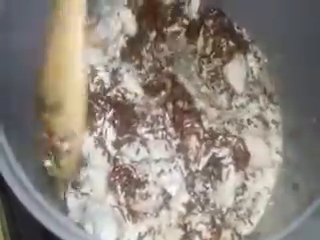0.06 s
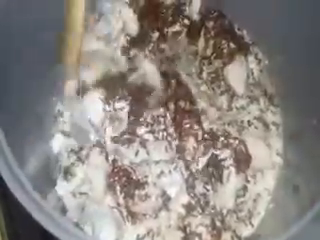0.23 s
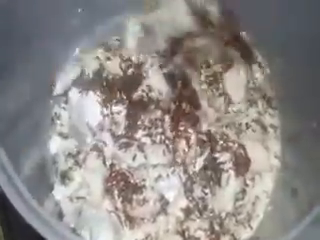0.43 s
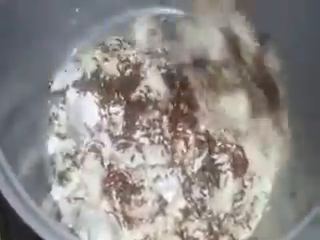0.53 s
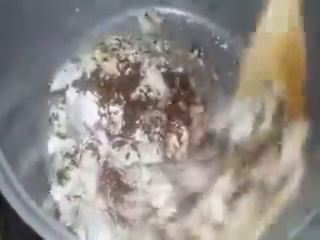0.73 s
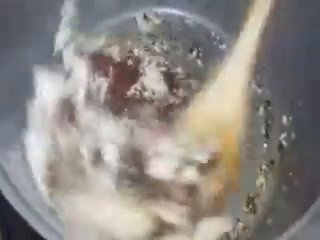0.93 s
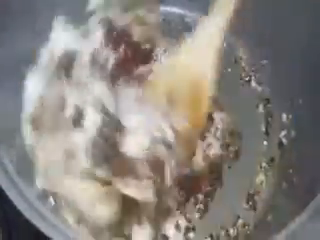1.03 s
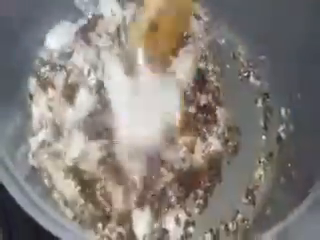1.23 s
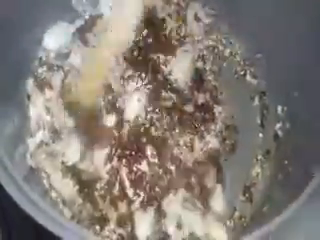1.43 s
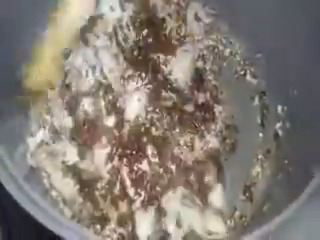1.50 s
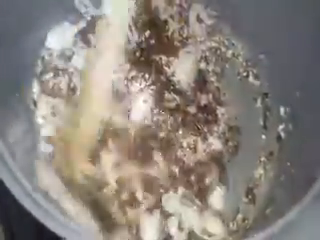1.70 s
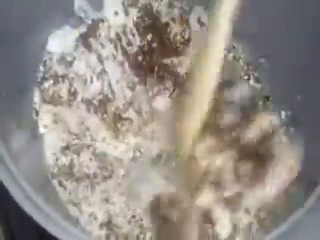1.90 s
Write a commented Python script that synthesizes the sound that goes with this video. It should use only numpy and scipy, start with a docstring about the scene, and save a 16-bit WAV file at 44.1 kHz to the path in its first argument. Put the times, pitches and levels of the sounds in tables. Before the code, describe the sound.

A wooden spoon stirs a thick mixture in a metal pot, knocking the wall hard early on, then scraping with a brief squeal and sinking into soft wet smearing and clicks; close microphone, kitchen, slight overload.

```python
"""A wooden spoon stirs a thick, creamy mixture in a metal pot, close up in a kitchen.
The spoon knocks the wall once, as fading tones and noise loud enough to overload the microphone.
It also scrapes round the pot: tiny random slips excite drifting resonances, muffled as the spoon sinks.
Grainy noise and short noise bursts make the mixture smear and click, and the spoon tick on the metal.
Low noise and bumps make the pot rumble on its base, with a faint late echo and steady hiss behind."""
import sys
import numpy as np
from scipy import signal
from scipy.fft import rfft, irfft
from scipy.io import wavfile

SR = 44100
rng = np.random.default_rng(int(sys.argv[2]) if len(sys.argv) > 2 else 0)


def dump_mix(stems):
    """Bounce the given channels to the path in sys.argv[1] as a 16-bit WAV at rate SR."""
    frames = np.atleast_2d(stems).T  # one column per channel
    limited = np.clip(frames, -1, 1)  # hard clip at full scale
    pcm = np.round(limited * 32767).astype(np.int16)
    wavfile.write(sys.argv[1], SR, pcm)


N = 85995  # length in samples

# high resonances of the bare metal, for scrape and ticks: pitch_hz, width_hz, level_db
RASP = [(3393.3, 120, 0), (3664, 90, 1), (3902, 150, -3), (4205, 170, -5), (4507, 133, 0), (4690, 132, -5),
        (5060, 140, -3.5), (5320, 130, -9), (5693, 157, -5), (6450, 130, -8.5), (6685, 190, -13.5),
        (7275, 180, -14), (10070, 250, -31.5)]


def amp(db):
    """Turns decibels into a plain gain."""
    return 10 ** (np.asarray(db) / 20)


def evened(x):
    """Scales a sound to an average strength (rms) of 1."""
    return x / np.sqrt(np.mean(x ** 2) + 1e-20)


def read(points, hz):
    """Reads a curve between its (pitch_hz, value) points, on a logarithmic pitch scale."""
    point_hz, value = np.transpose(points)
    return np.interp(np.log(hz + 1), np.log(point_hz + 1), value)


def level(points):
    """Gain over time from (time_s, level_db) points."""
    return amp(np.interp(np.arange(N) / SR, *np.transpose(points)))


def add(mix, start_s, sound):
    """Lays a sound into the mix from its start time."""
    part = mix[max(round(start_s * SR), 0):][:len(sound)]
    part += sound[:len(part)]


def colour(x, spectrum):
    """Boosts or cuts each pitch by a (pitch_hz, level_db) curve."""
    gain = amp(read(spectrum, np.fft.rfftfreq(len(x), 1 / SR)))
    return irfft(rfft(x) * gain, len(x))


def coloured_noise(spectrum, size):
    """Random noise of rms 1 with the given balance of pitches."""
    return evened(colour(rng.standard_normal(size), spectrum))


def resonate(x, hz, width_hz):
    """A steep resonance of gain 1, made by running one peak filter twice."""
    # each pass is wider, so that the two together have the asked width
    pass_width = min(1.55 * width_hz, .3 * SR)
    b, a = signal.iirpeak(min(hz, .45 * SR), hz / pass_width, SR)
    return signal.lfilter(b, a, signal.lfilter(b, a, x))


def band_noise(hz, width_hz, size):
    """Noise of rms 1 around one pitch, taken from the end, where the resonance has built up."""
    return evened(resonate(rng.standard_normal(SR // 2), hz, width_hz)[-size:])


def wander(rate_hz, size):
    """Random motion of rms 1, mostly slower than the given rate."""
    hz = np.fft.rfftfreq(size, 1 / SR)
    return evened(irfft(rfft(rng.standard_normal(size)) / (1 + (hz / rate_hz) ** 4), size))


def slow_wander(rate_hz):
    """Random values, so many a second, joined by straight lines."""
    knots = rng.standard_normal(200)
    return np.interp(np.arange(N) * rate_hz / SR, np.arange(len(knots)), knots)


def fade(t, t60):
    """Natural fade that loses 60 dB in t60 seconds; a negative t60 makes it grow instead."""
    return np.exp(-np.log(1000) * t / t60)


def fading_noise(t60s, spectrum):
    """Half a second of coloured noise, each band fading (or growing) at its own speed."""
    hz, t, bands = signal.stft(coloured_noise(spectrum, SR // 2), SR, nperseg=256)
    bands = bands * fade(t, read(t60s, hz)[:, None])
    return signal.istft(bands, SR, nperseg=256)[1][:SR // 2]


def slips():
    """Dense train of tiny stick-slip releases of uneven size and random direction."""
    slips_per_s, spread_db = 6000, 2.5
    size = amp(spread_db * np.minimum(rng.exponential(1, N), 4))
    return size * rng.choice([-1., 1.], N) * (rng.random(N) < slips_per_s / SR)


def hiss():
    """Steady coloured noise behind everything."""
    # balance of the hiss: pitch_hz, level_db (per Hz)
    hiss_spectrum = [(100, 13), (2000, 5.5), (5000, -17), (9000, -24.5), (15000, -5.5)]
    return amp(-67) * coloured_noise(hiss_spectrum, N)


def rumble():
    """The pot judders on its base as low noise, with a few soft bumps as short low tones."""
    # balance of the rumble: pitch_hz, level_db (per Hz)
    rumble_spectrum = [(20, -30), (38, -24), (60, -8), (85, -5), (106, 2), (135, -11), (165, -6),
                       (205, -14), (250, -12.5), (320, -29.5), (700, -54)]
    # loudness of the rumble: time_s, level_db
    rumble_level = [(0, -41), (.08, -37), (.3, -39.5), (.46, -47.5), (.56, -39), (.75, -41.5),
                    (1.02, -41.5), (1.33, -40.5), (1.46, -46.5), (1.58, -38.5), (1.8, -41.5), (1.95, -43)]
    # bumps of the pot: start_s, length_s, pitch_hz, level_db
    bumps = [(0.881, 0.109, 254.9, -39), (1.005, .05, 100.5, -37), (1.295, .055, 104.4, -38),
             (1.627, 0.056, 103.6, -29), (1.733, 0.033, 99.4, -32.5)]
    out = level(rumble_level) * coloured_noise(rumble_spectrum, N)
    for start_s, length_s, hz, db in bumps:
        t = np.arange(0, length_s, 1 / SR)
        swell = np.sin(np.pi * t / length_s)
        add(out, start_s, amp(db) * swell * np.sin(2 * np.pi * hz * t))
    return out


def late_echo(x):
    """A noise burst that swells near 5 kHz and stops at half a second echoes the sound that late."""
    # fade time of the echo noise, where negative grows: pitch_hz, t60_s
    echo_t60 = [(150, 0.2264), (1000, .32), (3000, 0.34), (8000, -0.33)]
    # balance of the noise before it fades or grows: pitch_hz, level_db
    echo_spectrum = [(100, -2), (600, 2.5), (1500, 1.5), (3000, -8.5), (4500, 0.5), (9000, -5.5)]
    # the fastest growing band, just above the change of sign, outweighs all the others
    echo = fading_noise(echo_t60, echo_spectrum)
    return amp(-12) * signal.fftconvolve(x, echo / np.linalg.norm(echo))[:N]


def mixture():
    """Tiny slips make a soft grainy smearing; short bursts of noise make small wet clicks and the bright top of
    the spoon's two late ticks."""
    # balance of the smearing, before it is evened out: pitch_hz, level_db (per Hz)
    smear_spectrum = [(150, -11.5), (260, 6), (600, -2), (1000, -1), (1700, 1), (2500, -8.5), (4000, -15.5),
                      (7000, -38), (8500, -28.5), (13000, -42)]
    # loudness of the smearing: time_s, level_db
    smear_level = [(0, -42.5), (.12, -49.5), (.22, -46), (.5, -51), (.65, -45.5), (.85, -42), (1.05, -45.5),
                   (1.3, -48), (1.44, -51), (1.64, -48.5), (1.76, -51.5), (1.95, -49.5)]
    # wet clicks, then the top near 10 kHz of the spoon's two ticks on the metal: start_s, pitch_hz, width_hz,
    # level_db
    clicks = [(1.055, 6600, 1000, -44), (1.1175, 5650, 400, -43), (1.207, 4600, 1600, -47),
              (1.276, 4000, 3500, -51), (1.344, 4900, 450, -49.5), (1.368, 6700, 599, -56.5),
              (1.621, 5980, 5000, -52), (1.625, 1380, 604, -34.5), (1.626, 552, 450, -38),
              (1.81, 9800, 1500, -54.5), (1.855, 9800, 1490, -57.5)]
    click_decay_s = 0.0043
    out = level(smear_level) * evened(colour(slips(), smear_spectrum))
    t = np.arange(SR // 20) / SR
    for start_s, hz, width_hz, db in clicks:
        burst = band_noise(hz, width_hz, size=len(t))
        add(out, start_s, amp(db) * np.exp(-t / click_decay_s) * burst)
    return out


def ticks():
    """The spoon touches bare metal and briefly rings its high resonances, as bands of noise."""
    # light ticks: start_s, level_db
    tick_list = [(1.809, -46.5), (1.854, -54)]
    decay_s, tilt_db_per_khz = 0.0088, 1
    out, t = np.zeros(N), np.arange(SR // 10) / SR
    for start_s, tick_db in tick_list:
        ring = np.zeros(len(t))
        for hz, width_hz, db in RASP:
            ring += amp(db + tilt_db_per_khz * hz / 1000) * band_noise(hz, width_hz, size=len(t))
        add(out, start_s, amp(tick_db) * np.exp(-t / decay_s) * evened(ring))
    return out


def knock():
    """The spoon lands with a clack; the pot rings and flutters, then fades faster."""
    # ringing of the pot wall: pitch_hz, level_db, t60_s
    pot = [(420.9, -14.5, 0.61), (785, -30, 0.47), (904.6, -15, 0.544), (1357, -28, 0.33),
           (1750, -34, 0.36), (1854, -17.5, 0.56), (2397, -25.5, .22), (2626, -8.5, 0.21),
           (2955, -10.5, 0.13), (3400, -23.5, .25), (3700, -34.5, 0.25), (5120, -43.5, 0.17),
           (5240, -38.5, .22), (6449, -50, .18)]
    # short-lived tones of the clack of wood on metal: delay_s, pitch_hz, level_db, t60_s
    clack = [(0, 185, -25, .3), (0, 495, -24, .25), (0, 1130, -28, .2), (0, 1540, -6, .035),
             (0, 1794, -0.5, .03), (0, 1990, -5.5, .06), (.003, 2670, 3, 0.037), (.006, 3100, -6.5, .04)]
    # rough wash of small pot tones and room, its balance: pitch_hz, level_db (per Hz)
    wash_spectrum = [(100, -17), (190, -1.5), (290, -13), (480, -4), (620, -11.5), (850, -1.5), (1400, 0),
                     (2000, 2.5), (2220, -11.5), (2600, 3), (3100, -1), (3800, -6.5), (4450, -22),
                     (5250, -13), (6000, -25), (7500, -31), (14000, -42)]
    # fade time of the wash: pitch_hz, t60_s
    wash_t60 = [(200, .4), (1000, .3), (3000, .25), (5300, .26), (7500, .09), (14000, 0.066)]
    # short noise around the knock: pitch_hz, level_db (per Hz)
    around_spectrum = [(150, -26), (330, -20), (600, -6), (1500, -1.5), (2100, -5.5), (2800, -1),
                       (3800, -9.5), (5300, -14), (7000, -28), (13000, -38.5)]
    knock_s = .2383
    contact_s = 0.00066  # the soft wood takes this long to load the wall
    late_s, late_fade_db_per_s = 0.13, 128.5  # after this time the ring fades faster
    # the ring flutters, high tones most, as the spoon stays on the wall
    flutter_hz, flutter_per_khz = 45, 0.16
    out, t = np.zeros(N), np.arange(SR // 2) / SR
    attack = 1 - np.exp(-t / contact_s)
    shape = attack * amp(-late_fade_db_per_s * np.maximum(t - late_s, 0))
    for hz, db, t60 in pot:
        depth = flutter_per_khz * hz / 1000
        # a complex factor shakes both the strength and the phase of the tone
        shake = wander(flutter_hz, size=len(t)) + 1j * wander(flutter_hz, size=len(t))
        tone = ((1 + depth * shake) * np.exp(2j * np.pi * hz * t)).imag
        add(out, knock_s, amp(db) * shape * fade(t, t60) * tone)
    for delay_s, hz, db, t60 in clack:
        tone = np.sin(2 * np.pi * hz * t)
        add(out, knock_s + delay_s, amp(db) * shape * fade(t, t60) * tone)
    add(out, knock_s, amp(-21) * shape * fading_noise(wash_t60, wash_spectrum))
    # noise swells into the knock and dies away after it
    swell_s = 0.0039
    around = t[:SR // 10] - t[SR // 20]
    noise = np.exp(-abs(around) / swell_s) * coloured_noise(around_spectrum, len(around))
    add(out, knock_s + around[0], amp(-10) * noise)
    return out


def drifting(x, hz, width_hz):
    """A steep resonance that the moving contact point detunes and makes stronger or weaker."""
    drift_hz, drift_share, drift_db = 16, 0.009, 1.5  # the share is of the pitch
    path_hz = hz * (1 + drift_share * slow_wander(drift_hz))
    # shift the moving pitch down to zero, smooth there, then shift it back up
    turn = np.exp(2j * np.pi * np.cumsum(path_hz) / SR)
    r = np.exp(-np.pi * 1.55 * width_hz / SR)
    held = signal.lfilter([(1 - r) ** 2], [1, -2 * r, r * r], x * turn.conj() + 1e-18)
    return 2 * (turn * held).real * amp(drift_db * slow_wander(drift_hz))


def scrape():
    """Stuttering slips of wood on metal excite four groups of pot resonances, with grit and squeaks."""
    # resonances from low to high, in three groups below RASP: pitch_hz, width_hz, level_db
    base = [(382.3, 33, -6), (431, 42, 0)]
    wall = [(909.4, 65, 7.5), (950, 70, -3)]
    squeal = [(1158, 54, -10), (1304.5, 60, 1.5), (1362, 48, 3.5), (1660, 110, -15.5)]
    # loudness of each group along the stroke: time_s, level_db
    base_level = [(0, -49.5), (.2, -51), (.44, -53.5), (.48, -45), (.55, -45), (.66, -40.5), (.76, -40),
                  (.86, -47), (1.07, -47), (1.2, -61.5), (1.95, -61.5)]
    wall_level = [(0, -56), (.2, -56.5), (.66, -54), (.78, -49), (.85, -39.5), (.98, -47), (1.09, -43.5),
                  (1.3, -60.5), (1.95, -66)]
    squeal_level = [(0, -39.5), (.04, -49), (.2, -53), (.6, -61), (.69, -43), (0.737, -30), (.78, -34.5),
                    (.92, -36.5), (1, -46.5), (1.14, -50), (1.236, -37), (1.28, -55), (1.47, -63),
                    (1.535, -46.5), (1.58, -59), (1.76, -57.5), (1.81, -52), (1.95, -60)]
    rasp_level = [(0, -37.5), (0.039, -57), (.16, -70.5), (.45, -66.5), (.59, -57), (.648, -40.5),
                  (.675, -46.5), (0.741, -28.5), (.78, -36.5), (.83, -37.5), (.95, -45.5), (1.1, -57),
                  (1.32, -58), (1.41, -73), (1.48, -66), (1.56, -78), (1.95, -72)]
    # gritty sizzle where the spoon meets bare metal: pitch_hz, level_db (per Hz)
    grit_spectrum = [(2500, -22), (3500, -3), (6700, 2.5), (8000, -10.5), (12000, -17), (15000, -29.5)]
    # loudness of the sizzle: time_s, level_db
    grit_level = [(0, -58), (.1, -78), (.6, -70), (.645, -51), (.68, -63), (.715, -42), (.77, -50),
                  (.95, -54), (1.1, -55), (1.3, -66.5), (1.42, -78), (1.95, -74.5)]
    # brief squeaks and groans of the spoon: start_s, length_s, pitch_hz, level_db
    squeaks = [(0, 0.12, 3380, -53), (0.089, .07, 2810, -54), (0.462, .06, 366, -41),
               (0.607, 0.058, 4500, -44.5), (0.631, .06, 399, -39), (0.714, 0.044, 1348, -29),
               (.83, .05, 863, -39), (0.886, .08, 1396, -37), (1.069, 0.0458, 1670, -45),
               (1.138, .06, 1680, -42), (1.201, .06, 1640, -41.5), (1.434, .11, 3330, -56),
               (1.836, 0.065, 2744, -58)]
    squeak_width = 0.051  # share of the pitch
    stutter_hz, stutter_db = 50, 0.9  # uneven grip of the spoon
    drive = slips() * amp(stutter_db * wander(stutter_hz, size=N))
    out = level(grit_level) * evened(colour(drive, grit_spectrum))
    groups = [(base, base_level), (wall, wall_level), (squeal, squeal_level), (RASP, rasp_level)]
    for group, curve in groups:
        ringing = sum(amp(db) * drifting(drive, hz, width_hz) for hz, width_hz, db in group)
        out += level(curve) * evened(ringing)
    for start_s, length_s, hz, db in squeaks:
        size = round(length_s * SR)
        squeak = np.hanning(size) * band_noise(hz, squeak_width * hz, size=size)
        add(out, start_s, amp(db) * squeak)
    return out


def sink(x):
    """The spoon sinks into the mixture, which muffles the treble: fades from open to dull sound."""
    sink_s, sink_time_s, sunk_hz = 0.81, 0.46, 6160
    dull = irfft(rfft(x) / (1 + (np.fft.rfftfreq(N, 1 / SR) / sunk_hz) ** 6), N)
    under = np.clip((np.arange(N) / SR - sink_s) / sink_time_s, 0, 1)
    return x + under * (dull - x)


def scene():
    """Adds all the layers; only the stirring has the late echo."""
    stirring = mixture() + ticks() + sink(scrape())
    return (hiss() + rumble() + late_echo(stirring) + knock() + stirring)[None]


def record(dry):
    """The microphone clips what is too loud; then a filter removes the highest treble."""
    overload, edge_hz = 0.97, 15750
    clipped = np.clip(dry, -overload, overload)
    low_pass = signal.firwin(511, edge_hz, window=("kaiser", 9), fs=SR)
    return signal.oaconvolve(clipped, low_pass[None], "same")


dry = scene()
out = record(dry)
dump_mix(out)
```